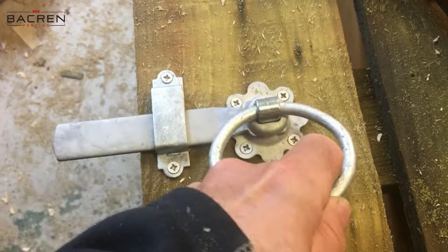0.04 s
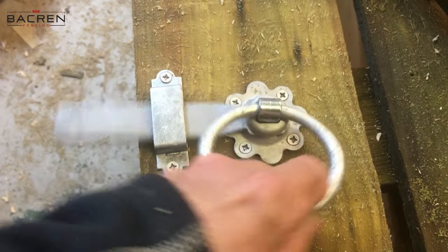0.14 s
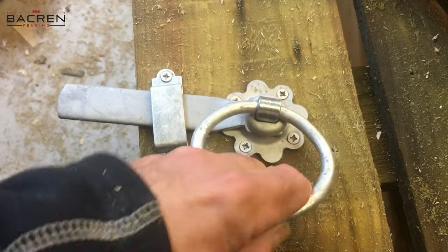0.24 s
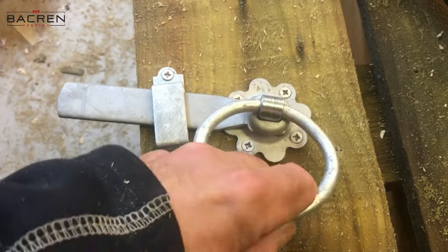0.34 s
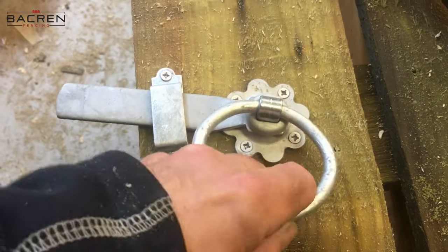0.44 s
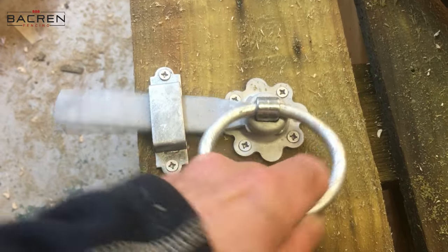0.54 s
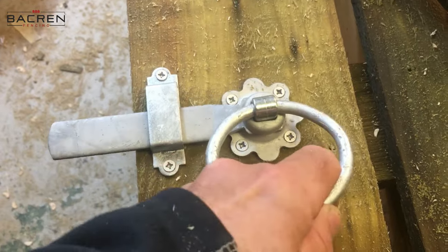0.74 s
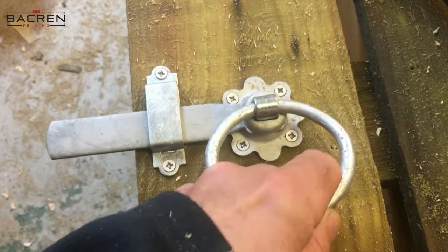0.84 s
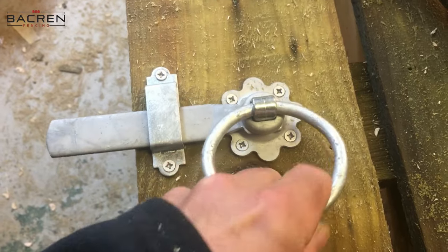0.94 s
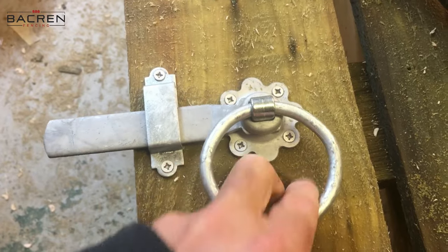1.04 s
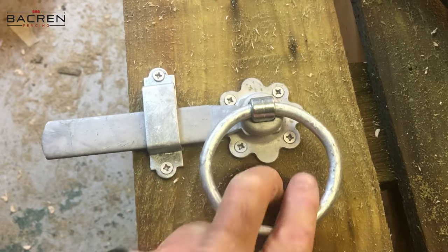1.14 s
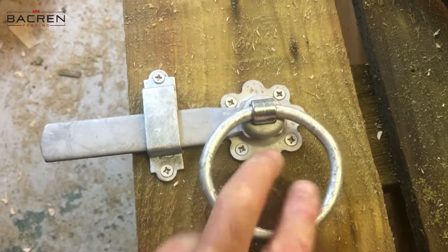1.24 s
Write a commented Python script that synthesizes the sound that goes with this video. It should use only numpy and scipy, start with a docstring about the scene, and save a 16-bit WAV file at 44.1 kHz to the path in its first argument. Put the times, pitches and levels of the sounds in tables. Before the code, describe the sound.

Close up in a lively, quiet room, a latch bar strikes its metal stop hard, then drops back with a duller clack; small ring jingles and scrapes come just before each, with woody resonance after.

```python
"""Gate latch in a reverberant room

A hand turns the iron ring of a latch on a wooden gate, over faint background noise.
An earlier clack is dying away as the sound begins; the bar then clacks on its top and bottom stops.
Dying sines make the bar, ironwork, boards and jingling ring; short noise bursts make the contacts.
Random slips make the rubbing, and noise that fades band by band makes the room's answer."""
import sys
import numpy as np
from scipy import signal
from scipy.fft import rfft, irfft
from scipy.io import wavfile
from scipy.ndimage import uniform_filter1d

SR = 44100
rng = np.random.default_rng(int(sys.argv[2]) if len(sys.argv) > 2 else 0)


def unload_audio(sound):
    """Save the sound as a 16-bit wav file, at the path given as the first command line argument."""
    columns = np.transpose(np.atleast_2d(sound))
    # keep every value between -1 and 1, then stretch to whole-number steps
    steps = np.round(np.clip(columns, -1, 1) * 32767)
    wavfile.write(sys.argv[1], SR, steps.astype(np.int16))


N = 57330  # samples, 1.3 s
T = np.arange(SR) / SR  # one second of time for a single event, s
TOUCH_S = 0.00049  # a light touch sets the modes going gradually


def amp(db):
    """Turns decibels into a gain."""
    return 10 ** (np.asarray(db) / 20)


def unit(x):
    """Scales a signal to rms 1."""
    return x / np.sqrt(np.mean(x ** 2) + 1e-20)


def read(points, hz):
    """Reads a table between its points, on a log-frequency axis."""
    f, value = np.transpose(points)
    return np.interp(np.log(hz + 1), np.log(f + 1), value)


def add(mix, start_s, sound):
    """Mixes a sound in at a start time; any part before time zero is cut off."""
    at = round(start_s * SR)
    sound = sound[max(-at, 0):]
    part = mix[max(at, 0):][:len(sound)]
    part += sound[:len(part)]


def fade(t, t60):
    """Exponential decay that falls by 60 dB in t60 seconds."""
    return np.exp(-np.log(1000) * t / np.maximum(t60, 1e-3))


def colour(x, spectrum):
    """Filters a signal by a spectrum and scales it to rms 1."""
    hz = np.fft.rfftfreq(len(x), 1 / SR)
    return unit(irfft(rfft(x) * amp(read(spectrum, hz)), len(x)))


def hiss(size):
    """Even noise: one click of random sign at a random place in every six samples."""
    spacing = 6
    out = np.zeros(size)
    at = np.arange(0, size - spacing, spacing)
    at = at + rng.integers(0, spacing, len(at))
    out[at] = rng.choice([-1., 1.], len(at))
    return unit(out)


def ring(modes):
    """Adds up the modes of a struck body: dying sines of alternating sign."""
    out = np.zeros(SR)
    for k, (hz, t60, db) in enumerate(modes):
        out += (-1) ** k * amp(db) * fade(T, t60) * np.sin(2 * np.pi * hz * T)
    return out


def ring_at_stop(mode_hz, mode_rows, bottom):
    """Rings a body whose modes are excited differently by the top (0) and bottom (1) stops."""
    return ring([(hz, t60, levels[bottom]) for hz, (t60, *levels) in zip(mode_hz, mode_rows)])


def struck(spectrum, t60, tilt_db=0):
    """Contact noise that starts at once and dies fast, tilted in dB per octave above 500 Hz."""
    size = 2048
    hz = np.fft.rfftfreq(size, 1 / SR)
    level = np.log(amp(read(spectrum, hz) + tilt_db * np.log2(np.maximum(hz, 500))))
    # a minimum-phase filter, so that nothing sounds before the contact
    both_sides = np.r_[level, level[-2:0:-1]]
    taps = np.fft.ifft(np.exp(np.conj(signal.hilbert(both_sides)))).real
    burst = hiss(SR) * fade(T, t60)
    return signal.fftconvolve(burst, taps / np.linalg.norm(taps))[:SR]


def reverberate(noise):
    """Turns noise into a room tail: a short build-up, then each band dies at its own speed."""
    # how long the room rings: f/Hz, t60/s
    room_decay = [(100, 0.42), (300, 0.44), (700, 0.47), (1800, 0.44), (4500, 0.41), (8000, 0.35),
                  (14000, 0.2)]
    delay_s, rise_s = 0.002, 0.0043
    hz, t, bands = signal.stft(noise, SR, nperseg=512)
    fading = bands * fade(t, read(room_decay, hz)[:, None])
    tail = signal.istft(fading, SR, nperseg=512)[1][:SR]
    return tail * (1 - np.exp(-np.maximum(T - delay_s, 0) / rise_s))


def in_room(x, wet_db):
    """Adds the room's reverberation to a sound."""
    tail = reverberate(hiss(SR))
    wet = signal.fftconvolve(x, tail / np.linalg.norm(tail))[:len(x)]
    return x + amp(wet_db) * wet


def background():
    """Faint steady noise of the quiet room."""
    # noise spectrum: f/Hz, level per hertz/dB
    floor_spectrum = [(25, 3.5), (60, 2), (120, -5), (400, 0.5), (1200, -13), (4000, -16.5), (9000, -23),
                      (15500, -27)]
    level_db = -68.5
    return amp(level_db) * colour(rng.standard_normal(N), floor_spectrum)


def rubbing():
    """Tiny random slips of spindle and bar shake the boards and scrape the metal as the hand moves."""
    # how strong the rubbing is: t/s, low judder level/dB, scrape level/dB
    rub = [(0, -48, -53), (0.099, -73, -87), (0.133, -36, -34), (.165, -41, -63), (.195, -36.5, -67),
           (0.224, -35, -43), (0.299, -76, -69), (.49, -74, -75), (0.523, -50.5, -65), (.55, -54.5, -86),
           (0.599, -42, -76), (.64, -54.5, -42), (.72, -45.5, -54), (.85, -66.5, -83), (0.896, -54, -75),
           (.97, -76, -86.5), (1.02, -63.5, -77.5), (1.08, -57, -67), (1.15, -61.5, -66.5),
           (1.24, -69, -71.5), (1.3, -64.5, -62)]
    # spectra of the shaken boards and the scraped metal: f/Hz, level per hertz/dB
    judder = [(30, -33.5), (70, -20.5), (120, -7.5), (180, 5), (260, -3.5), (480, -10), (900, -16),
              (3000, -52)]
    scrape = [(150, -18), (500, -1), (1000, -8.5), (1700, -3), (3200, -16.5), (5500, -16), (9000, -30),
              (15000, -38)]
    slips_per_s, slip_spread_db, room_db = 830, 2.5, 2
    out = np.zeros(N)
    s, judder_db, scrape_db = np.transpose(rub)
    for spectrum, level_db in ((judder, judder_db), (scrape, scrape_db)):
        happens = rng.random(N) < slips_per_s / SR
        sign = rng.choice([-1., 1.], N)
        size_db = slip_spread_db * np.minimum(rng.exponential(1, N), 3)
        slips = happens * sign * amp(size_db)
        level = amp(np.interp(np.arange(N) / SR, s, level_db))
        out += colour(in_room(slips, room_db), spectrum) * level
    return out


def chime():
    """The ring jingles in its own modes, partly heard through the room."""
    # modes of the ring: f/Hz
    chime_hz = [4150, 5566, 6503, 7480, 7620, 8960, 9170, 10650, 11420, 11510, 13200, 13290]
    # for each mode: t60/s, level/dB
    chime_modes = [(0.048, -14.5), (0.099, -12), (0.13, -20.5), (.03, -7), (0.024, -4.5), (0.11, -22.5),
                   (0.046, -13.5), (0.036, -20.5), (0.07, -20.5), (0.11, -22), (.05, -23), (.17, -26.5)]
    room_db = -4
    jingle = ring([(hz, *mode) for hz, mode in zip(chime_hz, chime_modes)])
    return in_room(jingle * (1 - np.exp(-T / TOUCH_S)), room_db)


def knock():
    """A light knock sets the modes of the boards ringing."""
    # modes of the boards: f/Hz, t60/s, level/dB
    knock_modes = [(149, 0.69, -16.5), (159, .25, -11.5), (226.7, .25, -14), (310, .12, -20.5),
                   (390, 0.21, -13), (443.8, .2, -10), (525, 0.06, -15), (640, .15, -22.5),
                   (970.5, 0.29, -24)]
    return ring(knock_modes) * (1 - np.exp(-T / TOUCH_S))


def tick(level_db, bright_db, chime_db, knock_db):
    """A light metal contact in the loose pivot chimes the ring and knocks the boards."""
    # noise of the contact: f/Hz, level per hertz/dB
    tick_spectrum = [(30, -39), (100, -12.5), (400, -3), (900, -4), (1800, 2.5), (3200, -7.5),
                     (6000, -11.5), (9000, -20), (11000, -28.5), (15500, -42.5)]
    t60_s, room_db = 0.02, -6
    contact = in_room(struck(tick_spectrum, t60_s, bright_db), room_db)
    return amp(level_db) * (contact + amp(chime_db) * chime() + amp(knock_db) * knock())


def ring_bar(bottom):
    """Bar and keeper ring briefly after the blow."""
    # modes of bar and keeper: f/Hz
    bar_hz = [640, 1012, 1370, 1662, 2040, 2400, 2660, 3060, 3650, 4145, 4410, 4778, 6280, 7280]
    # for each mode: t60/s, level at the top stop/dB, level at the bottom stop/dB
    bar_modes = [(.04, -23, -31.5), (.045, -14, -21), (.03, -15, -12.5), (0.027, -4, -6.5),
                 (.04, -14, -11.5), (.038, -23, -35), (.03, -17, -17), (.04, -20.5, -21.5),
                 (.02, -44, -14.5), (.04, -19.5, -24.5), (.03, -27, -28), (.025, -20, -20),
                 (.025, -22.5, -34), (.03, -22, -23)]
    return ring_at_stop(bar_hz, bar_modes, bottom)


def ring_ironwork(bottom):
    """The ironwork rings on faintly, longer than the bar."""
    # modes of the ironwork: f/Hz
    iron_hz = [1055, 1260, 1510, 1892, 2218, 2379, 3397, 4295, 4772, 5290, 5950, 6277, 6837, 11510]
    # for each mode: t60/s, level at the top stop/dB, level at the bottom stop/dB
    iron_modes = [(.3, -32.5, -46), (.25, -31, -39), (0.12, -35, -40.5), (.3, -36, -42.5), (.3, -34, -46),
                  (.25, -36, -55.5), (.3, -43, -49.5), (.33, -38.5, -50), (.35, -42.5, -52.5),
                  (.4, -45.5, -69.5), (.3, -41.5, -61.5), (.38, -43.5, -57.5), (.25, -41.5, -53.5),
                  (.3, -58, -55)]
    return ring_at_stop(iron_hz, iron_modes, bottom)


def boom_boards(bottom, shudder_db):
    """The wooden boards ring and shudder, swelling a moment after the blow."""
    # modes of the boards: f/Hz
    boards_hz = [130, 171, 205, 272, 296, 404, 431, 496, 514, 565, 672, 841, 980]
    # for each mode: t60/s, level at the top stop/dB, level at the bottom stop/dB
    boards_modes = [(.3, -37.5, -40), (0.48, -37, -43), (.25, -38.5, -29.5), (.25, -24.5, -24.5),
                    (.2, -28, -42.5), (.18, -31, -38.5), (.25, -35, -23), (.13, -21.5, -33.5),
                    (0.34, -21, -35), (.2, -33.5, -29), (.22, -27, -35.5), (.25, -30, -34.5),
                    (.22, -30, -29)]
    # noise of the brief shudder: f/Hz, level per hertz/dB
    shudder = [(40, -52), (110, -21.5), (260, -1.5), (520, 2), (750, -10.5), (1300, -6), (2000, -15.5),
               (3500, -31.5), (12000, -47)]
    base_db, t60_s, rise_s = -15, .14, 0.015
    boards = ring_at_stop(boards_hz, boards_modes, bottom)
    boards += amp(base_db + shudder_db) * struck(shudder, t60_s)
    return boards * (1 - np.exp(-(T / rise_s) ** 2))


def crack(extra_db=0):
    """The crack of contact: a very short noise burst."""
    # noise of the crack: f/Hz, level per hertz/dB
    crack_spectrum = [(30, -46.5), (70, -28.5), (130, -13.5), (400, 1), (900, 2), (2500, 5.5), (3500, -9.5),
                      (4500, -10), (7000, -8.5), (9500, -23), (14000, -28.5), (16000, -35)]
    base_db, t60_s = -8.5, 0.02
    return amp(base_db + extra_db) * struck(crack_spectrum, t60_s)


def uneven(noise):
    """Makes the noise's spectrum uneven at random, so the tail sounds grainier, keeping the power even."""
    # strength of the unevenness: f/Hz, depth/dB
    uneven_depth = [(300, 0), (1000, 2.5), (2500, 3), (5000, 4), (9000, 2.5)]
    spacing_hz, count = 44.75, 1000
    hz = np.fft.rfftfreq(len(noise), 1 / SR)
    heights = np.clip(rng.standard_normal(count), -2, 2)
    bumps = np.interp(hz / spacing_hz, np.arange(count), heights)
    gain = amp(read(uneven_depth, hz) * bumps)
    nearby_gain = np.sqrt(uniform_filter1d(gain ** 2, size=500))
    return irfft(rfft(noise) * gain / nearby_gain, len(noise))


def spill(bottom, room_db):
    """The room rings on with the sound that this stop sends into it."""
    # spectra sent out by the top and bottom stops: f/Hz, level per hertz/dB
    spill_top = [(30, -58.5), (70, -32), (135, -12.5), (290, -7.5), (500, -3.5), (790, -10.5), (1340, -7.5),
                 (2750, -12), (3340, -18.5), (3670, -28), (4340, -15), (5500, -22.5), (6850, -19),
                 (8500, -29.5), (9600, -39), (11500, -39.5), (15500, -60.5)]
    spill_bottom = [(30, -60.5), (65, -23), (140, -9), (270, -4), (360, -8), (450, -4.5), (1130, -11),
                    (1590, -8.5), (2060, -14.5), (4240, -19.5), (5390, -27), (6690, -24), (9000, -33.5),
                    (10200, -46.5), (11600, -41), (15500, -58.5)]
    base_db = -20
    sent = colour(uneven(hiss(SR)), (spill_top, spill_bottom)[bottom])
    return amp(base_db + room_db) * reverberate(sent)


def clack(level_db, stop, room_db, shudder_db, rebound_s, rebound_db, recrack_db):
    """The bar hits its keeper and rebounds once; boards, ironwork and room ring on."""
    bottom = int(stop > .5)
    bar = ring_bar(bottom)
    out = bar + ring_ironwork(bottom) + crack() + boom_boards(bottom, shudder_db)
    add(out, rebound_s, amp(rebound_db) * bar + crack(recrack_db))
    out += spill(bottom, room_db)
    return amp(level_db) * out


def scene():
    """Background, rubbing, ticks and clacks of the latch, added together."""
    # the ring and spindle tick in their play:
    # t/s, level/dB, brightness/dB per octave, ring chime/dB, knock on the boards/dB
    ticks = [(.1182, -27, -1, -18, -7.5), (.1280, -26.5, -2.5, -15, 2.5), (.1322, -30, 7, 0, 3),
             (.1445, -41, 1.5, -2, -10), (0.1861, -44, -1.5, -8, 4.5), (0.2379, -35.5, 0, -1, -10.5),
             (.5005, -44.5, -5.5, -25.5, -13.5), (.5155, -42.5, -13.5, -34.5, -4.5),
             (.5545, -40.5, -5.5, -27, -12), (.5600, -48, -1.5, -19.5, -13.5), (.5670, -40, -2.5, -26, -14),
             (.5730, -38, -4, -29, -10.5), (0.6129, -51.5, -4, -28, 9.5), (.6235, -35, -0.5, -11.5, -7),
             (.6265, -38.5, -2, -4, 7)]
    # the bar hits a stop: t/s, level/dB, stop (0 top, 1 bottom), room/dB, shudder of the boards/dB,
    # rebound delay/s, rebound of the bar/dB, rebound crack/dB
    clacks = [(-.19, -4, 1, 4, -6, .003, -6, -6), (.2190, 1, 0, -2, -1, 0.0068, -19.5, -3),
              (.6381, -6, 1, 0, 1, .0031, -6, -7)]
    mix = background() + rubbing()
    for start_s, *settings in ticks:
        add(mix, start_s, tick(*settings))
    for start_s, *settings in clacks:
        add(mix, start_s, clack(*settings))
    return mix[None]


def record(dry):
    """The microphone rounds off the loudest peaks, loses the deep bass and limits the treble."""
    ceiling, low_cut_hz, top_hz = 1.0, 52, 15800
    rounded = ceiling * np.tanh(dry / ceiling)
    bass_cut = signal.butter(2, low_cut_hz, "high", fs=SR, output="sos")
    treble_cut = signal.firwin(255, top_hz, window=("kaiser", 9), fs=SR)
    return signal.oaconvolve(signal.sosfilt(bass_cut, rounded), treble_cut[None], "same")


dry = scene()
out = record(dry)
unload_audio(out)
```